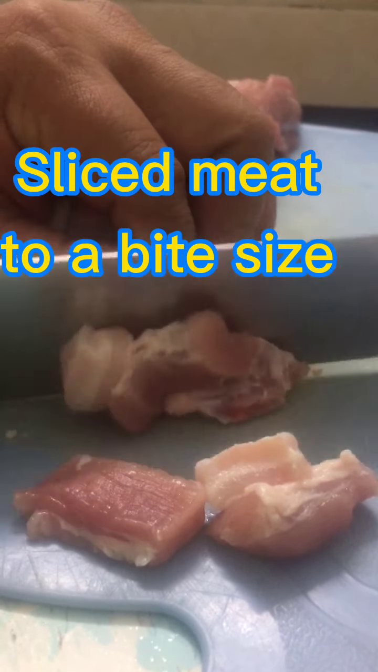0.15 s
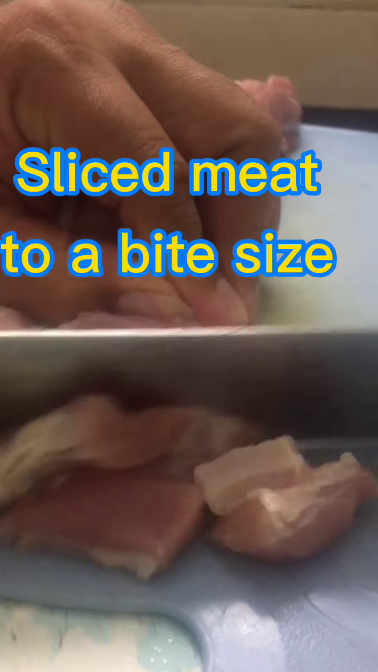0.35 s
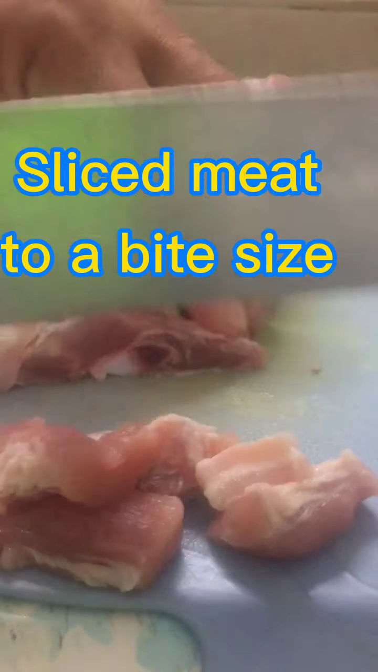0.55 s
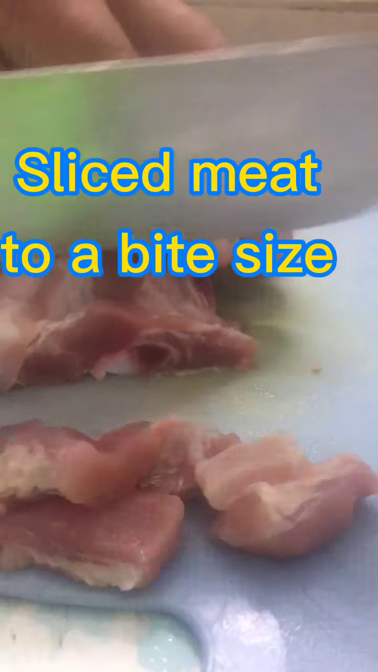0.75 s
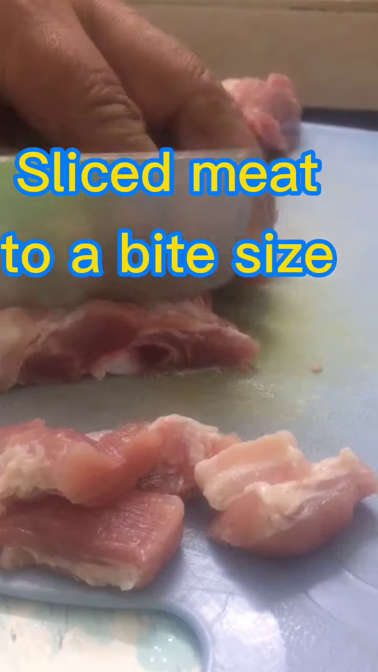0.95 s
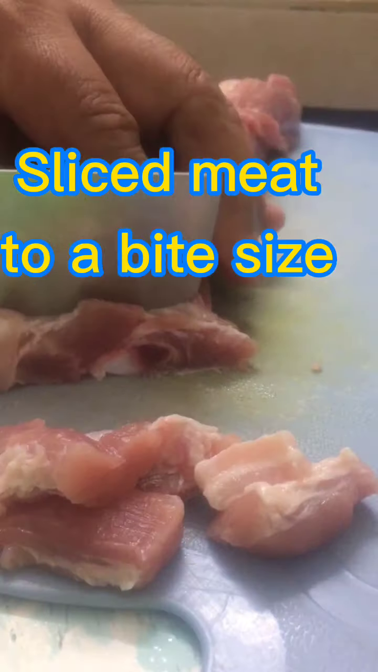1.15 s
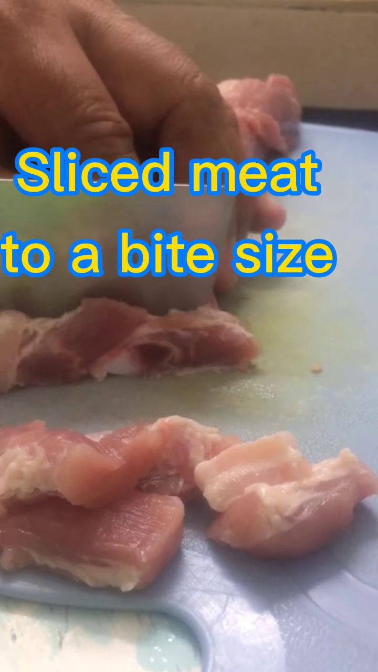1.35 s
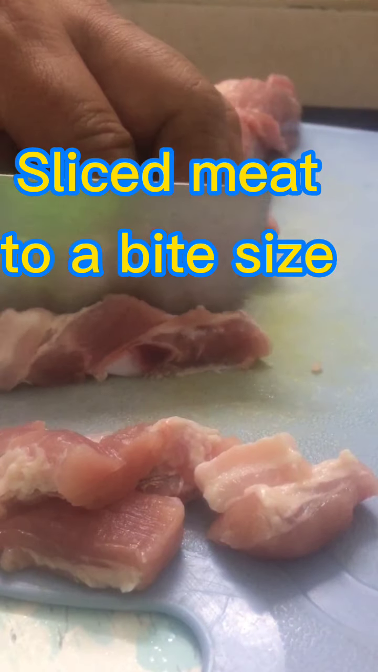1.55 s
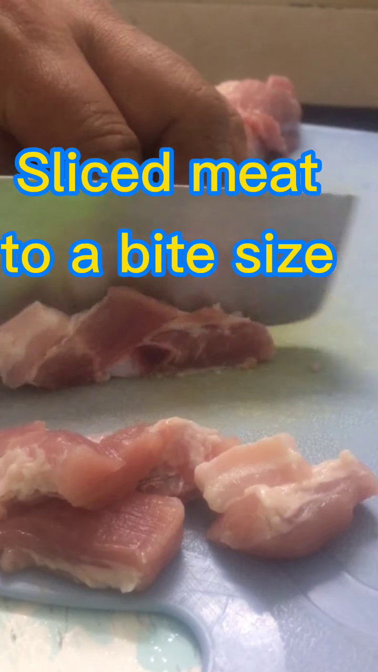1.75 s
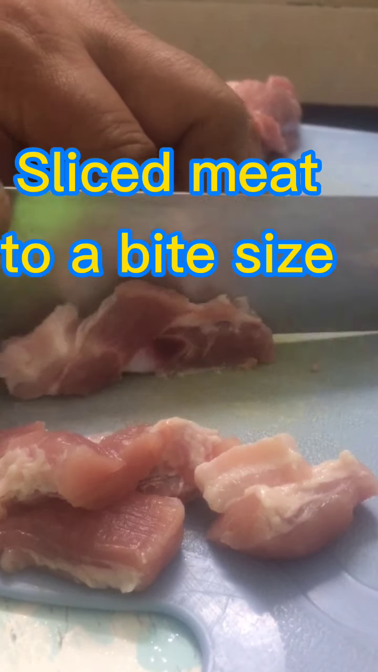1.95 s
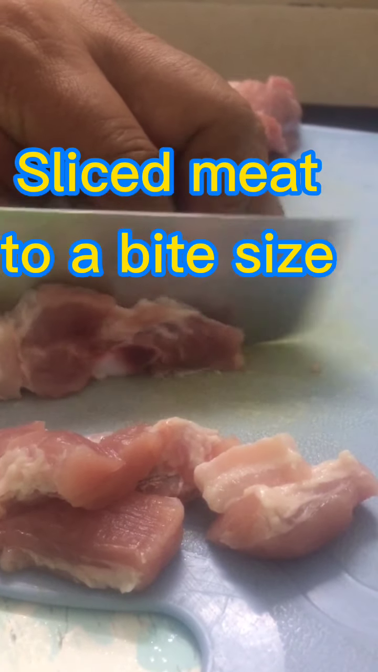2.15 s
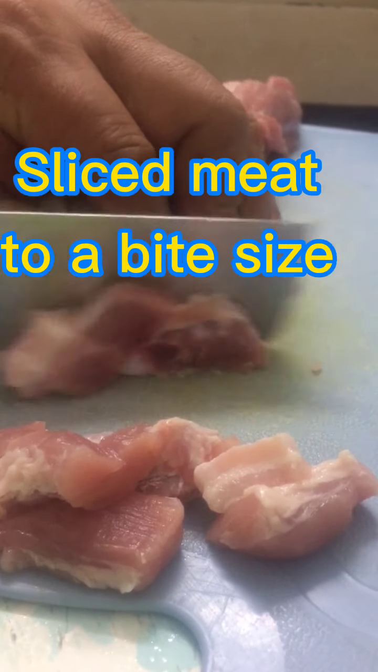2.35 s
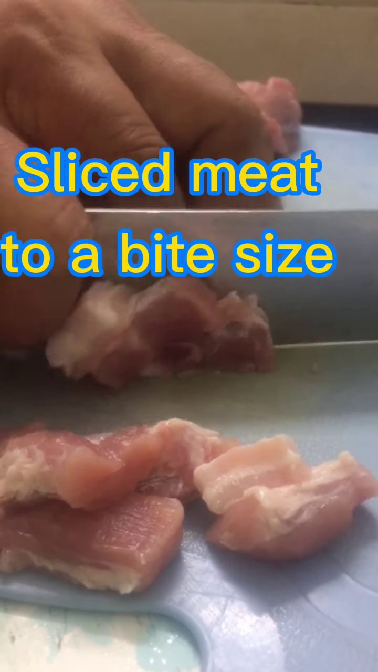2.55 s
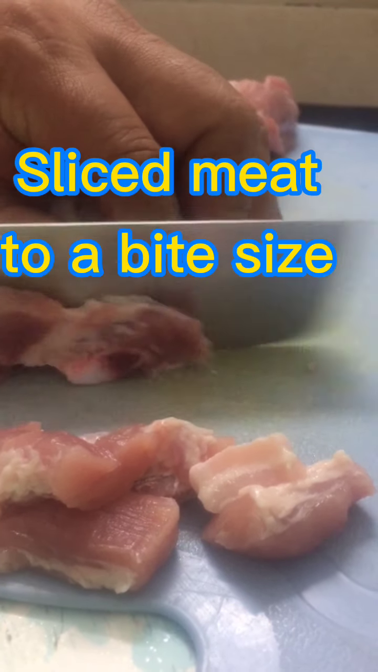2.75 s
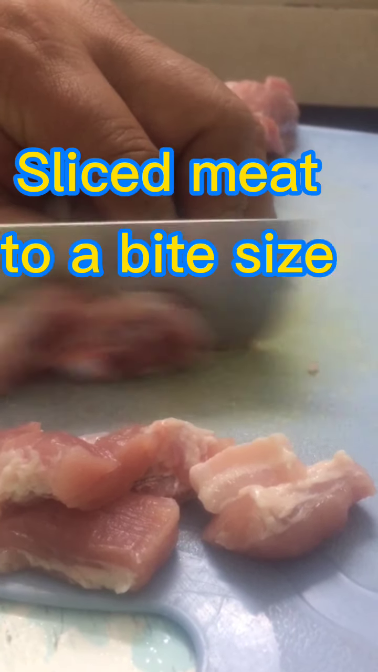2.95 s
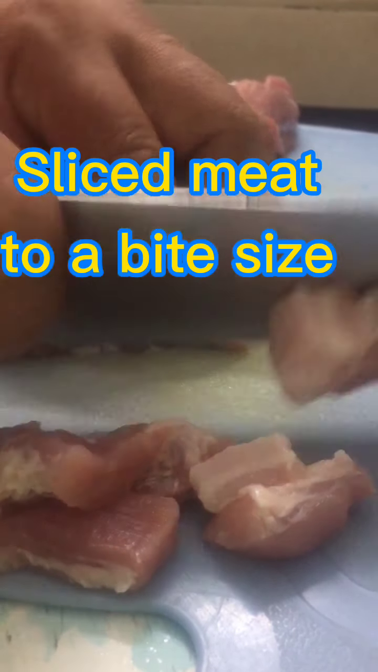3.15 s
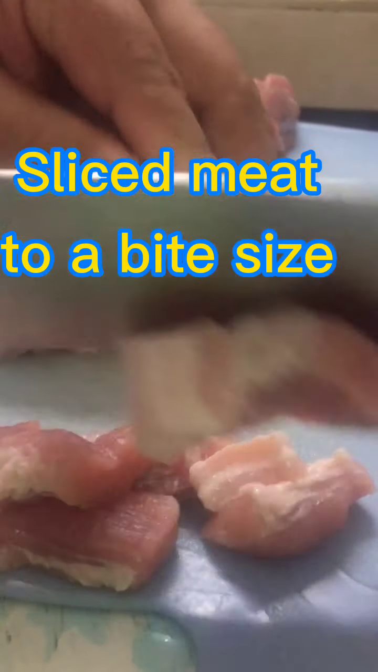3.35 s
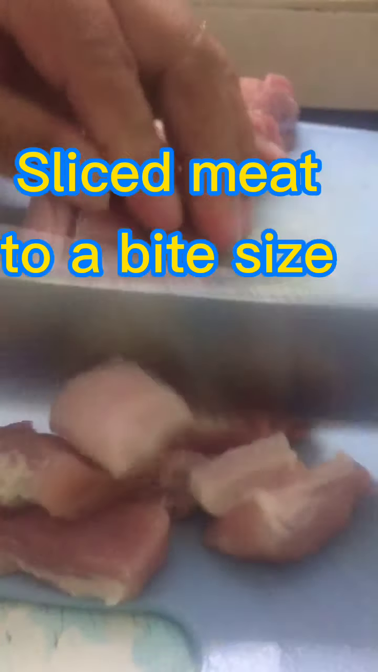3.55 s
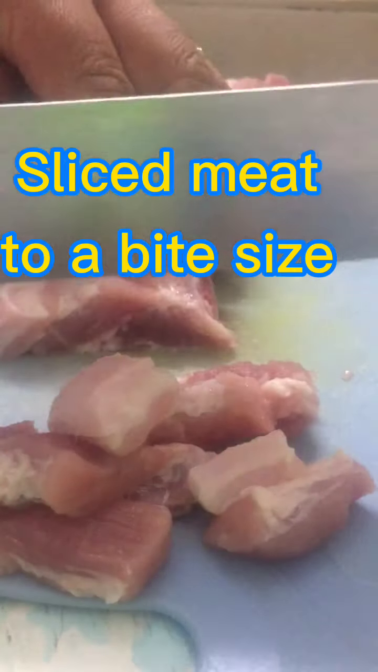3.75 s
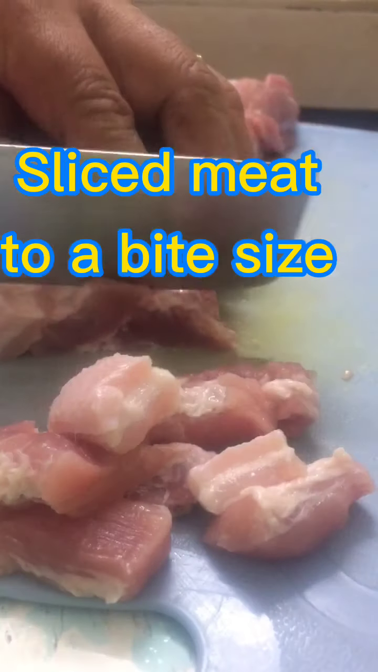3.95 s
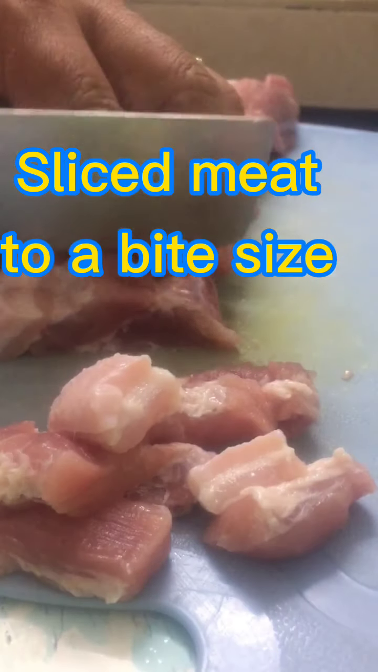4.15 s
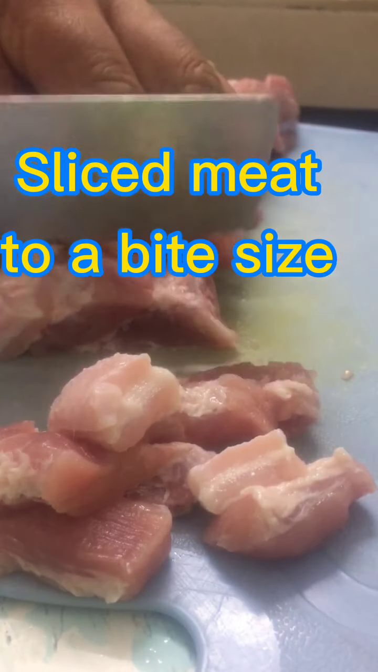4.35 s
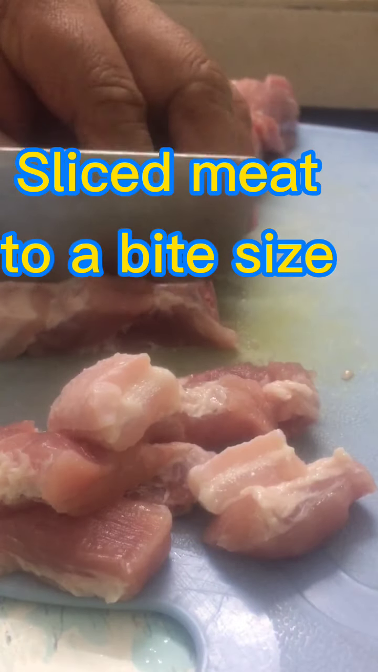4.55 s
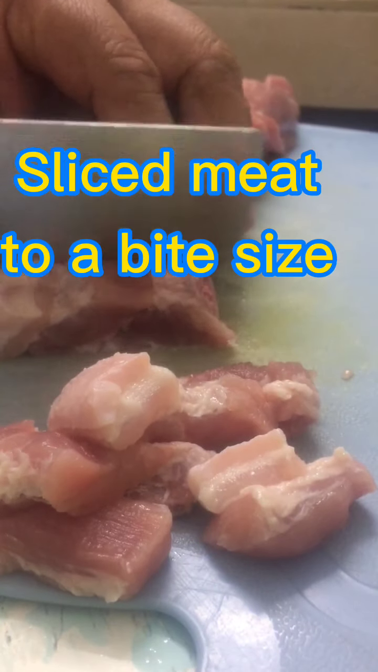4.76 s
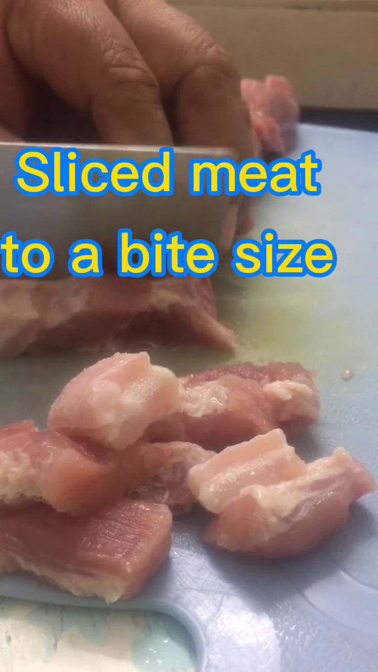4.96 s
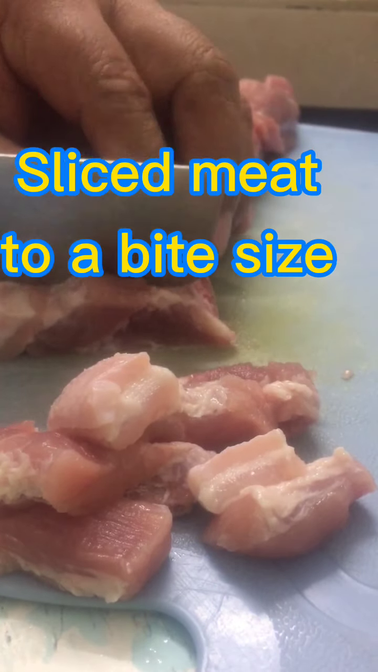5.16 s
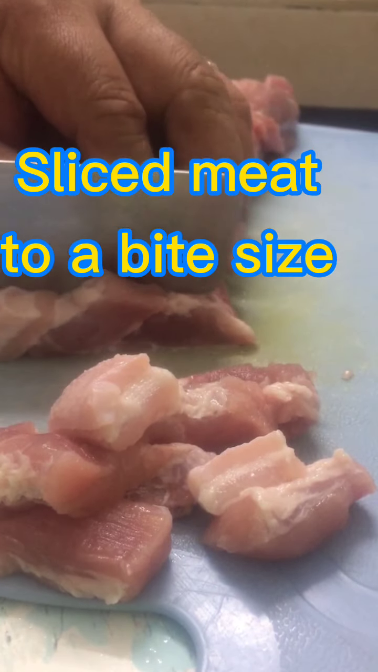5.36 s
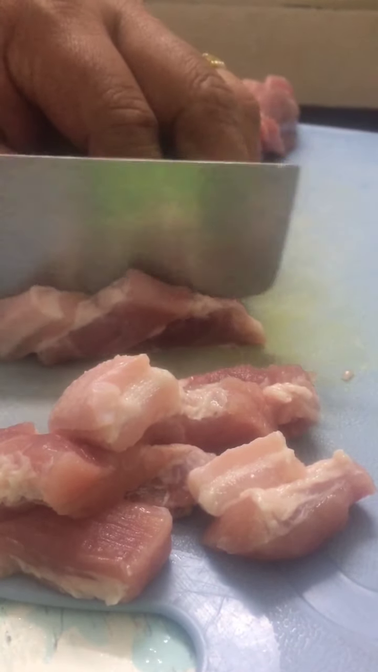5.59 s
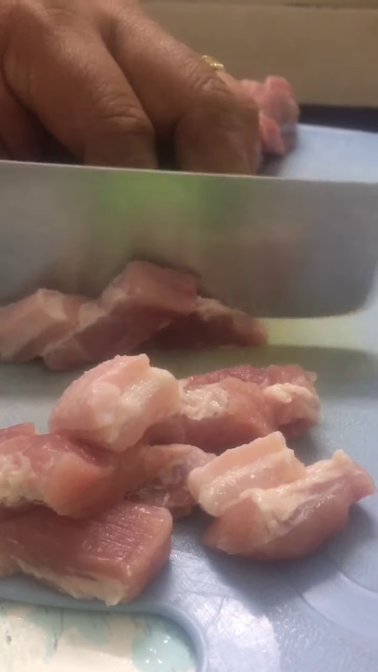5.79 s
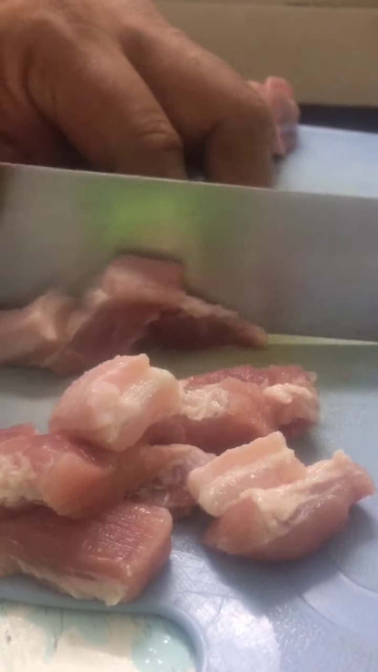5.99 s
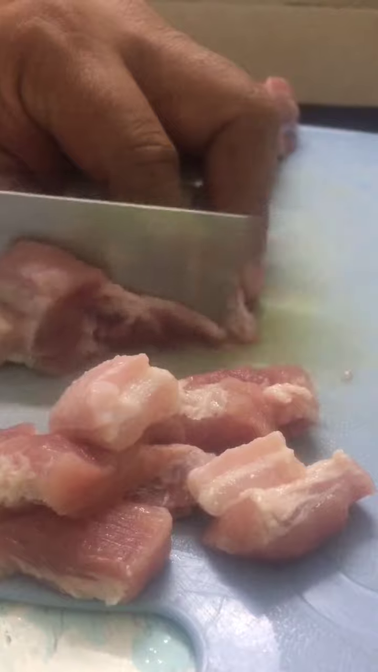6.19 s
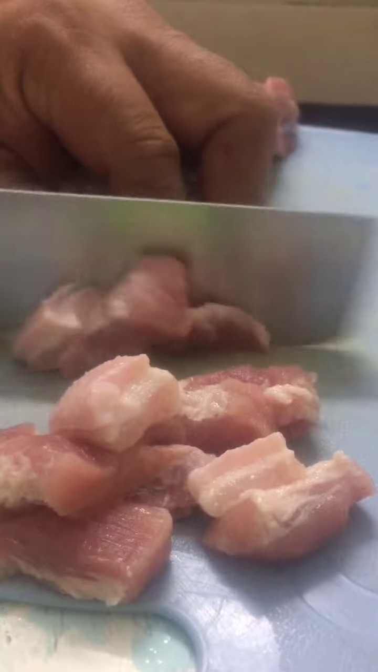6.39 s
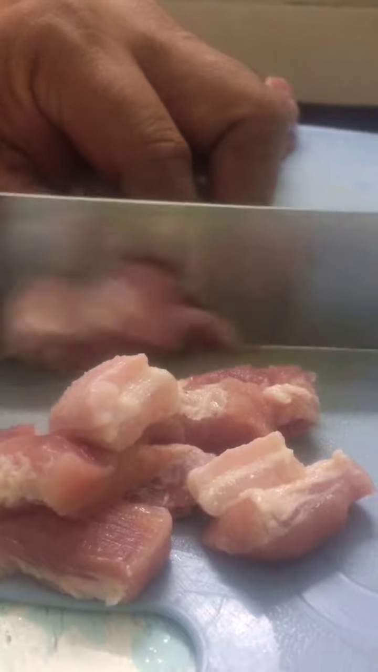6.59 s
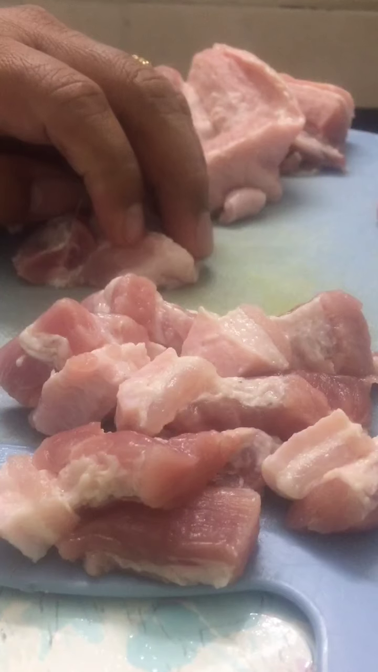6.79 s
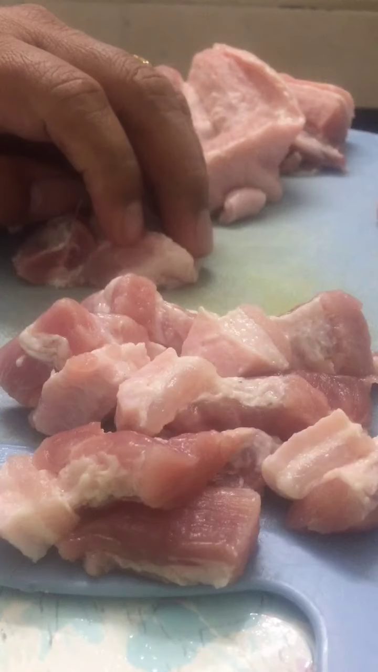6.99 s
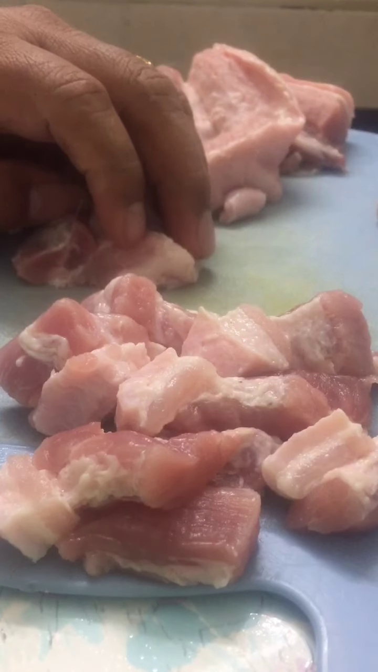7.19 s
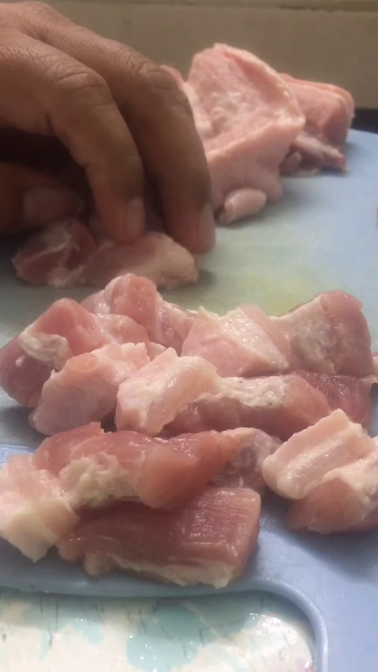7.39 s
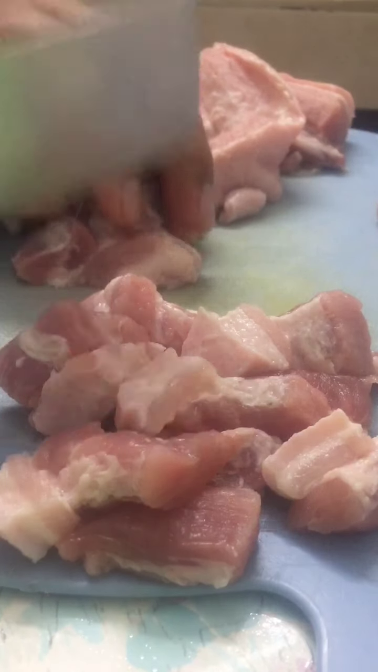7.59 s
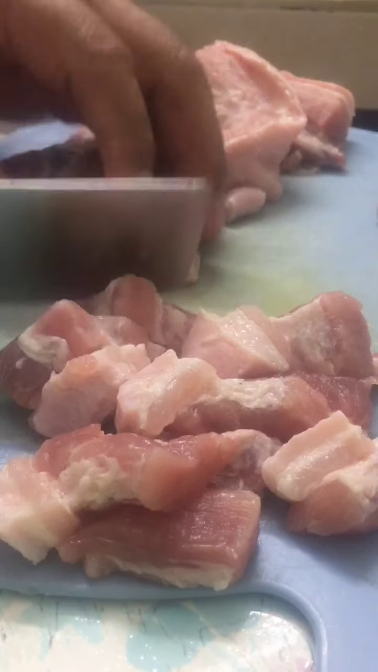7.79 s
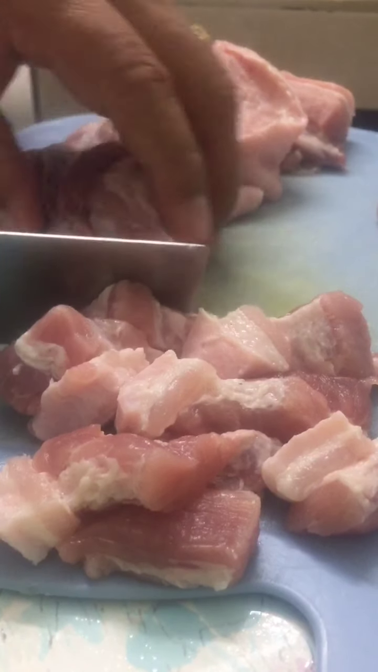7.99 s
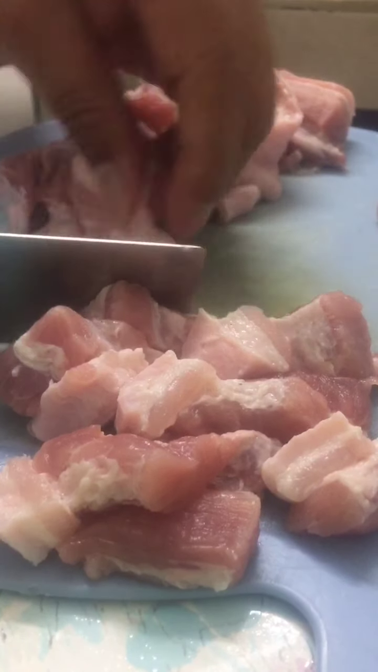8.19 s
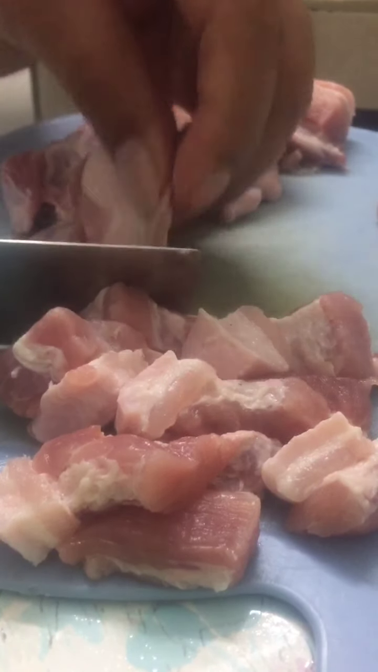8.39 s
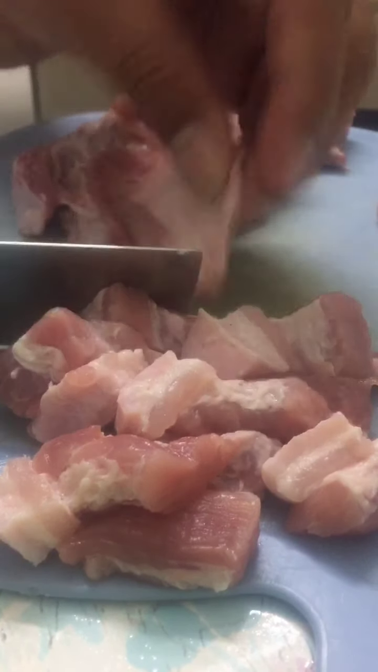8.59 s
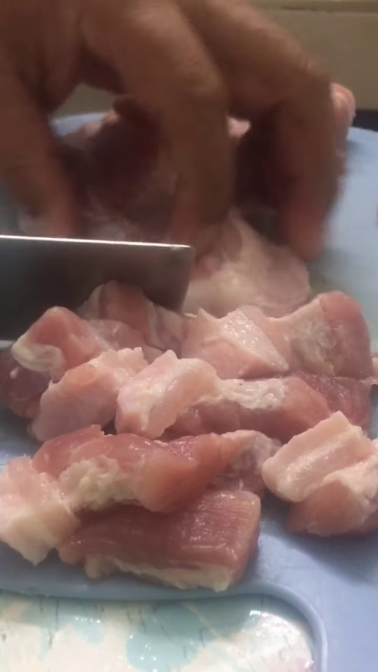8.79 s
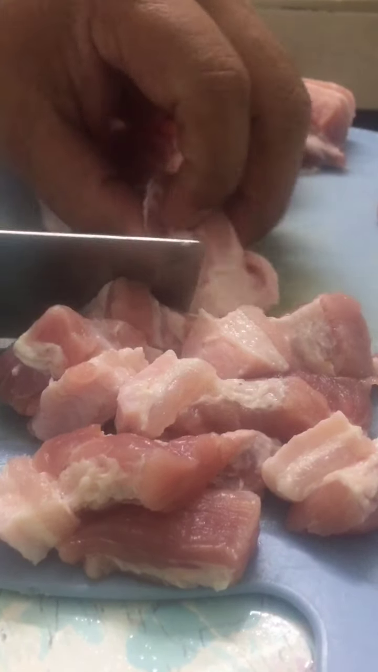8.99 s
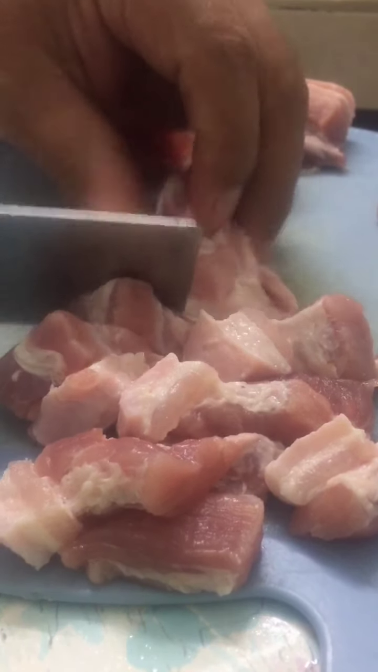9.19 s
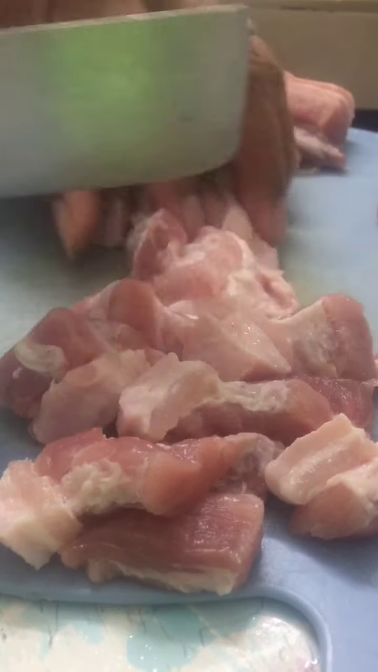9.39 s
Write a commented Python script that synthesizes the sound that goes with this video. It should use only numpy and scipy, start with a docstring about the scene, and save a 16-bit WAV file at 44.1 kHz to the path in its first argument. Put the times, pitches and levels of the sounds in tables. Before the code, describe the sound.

Close in a small kitchen with short reflections, a broad knife cuts raw meat on a plastic board. In the first 0.6 seconds, quick grainy strokes rasp and hiss, with a low thud, a bright tap and brief groaning squeaks. A pause follows, with muffled traffic and a low engine rev swelling around 1.6. From 1.7 to 3.1 come repeated sawing scrapes, loudest near 2.4 with a sharp click, then knocks at 3.4 and 3.6. Sparse thuds and taps at 4.3 to 4.6 lead to a fainter rev around 5.3. Sawing resumes from 5.7 to 6.7, rough and wet. At 6.7 everything cuts off abruptly to a much quieter background. Soft knocks arrive from 7.5, a short stroke at 8.1, sticky smacks and little clicks to 8.6, then a tearing stroke with a knock at 8.9 and final wet crackles until about 9.4.

```python
"""In a small kitchen, close by, a broad knife saws raw pork into pieces on a plastic cutting board.
Each stroke layers fibre slips ringing the board, scratches dragged under the edge, and a wet blade hiss.
Struck board modes knock, ringing snaps smack or click, and noise bands, some gliding, squeak and groan.
Filtered noise hums as traffic outside and an engine revs twice. At 6.727 s a cut to a later moment ends
the slice and its room tail; a second, quieter scene follows.
"""
import sys
import numpy as np
from scipy import signal
from scipy.io import wavfile
from scipy.ndimage import map_coordinates

SR = 44100
rng = np.random.default_rng(int(sys.argv[2]) if len(sys.argv) > 2 else 0)


def pcm_store(signal):
    """Save signal as 16-bit PCM."""
    levels = np.round(np.clip(np.atleast_2d(signal), -1, 1) * 32767)
    wavfile.write(sys.argv[1], SR, levels.astype(np.int16).T)


N = 416304
TIME, HZ = np.arange(N) / SR, np.fft.rfftfreq(8192, 1 / SR)
CUT_S = 6.727  # cut between the two scenes: kitchen sounds and room tails of the first end here
TOP_HZ = 16150  # upper limit of the sound


def amp(db):
    """Decibels to gain."""
    return 10 ** (np.asarray(db) / 20)


def unit(x):
    """Scales to rms 1."""
    return x / np.sqrt(np.mean(x ** 2) + 1e-20)


def read(points, hz):
    """Joins points by straight lines on a log-frequency axis."""
    point_hz, value = np.transpose(points)
    return np.interp(np.log(hz + 1), np.log(point_hz), value)


def add(mix, start_s, sound):
    """Mixes a sound in at start_s; the cut ends whatever began in the first scene."""
    stop = round(CUT_S * SR) if start_s < CUT_S else N
    part = mix[max(round(start_s * SR), 0):stop][:len(sound)]
    part += sound[:len(part)]


def colour(x, db):
    """Causal minimum-phase filter with the gain db on the grid HZ."""
    log_gain = np.log(amp(np.r_[db, db[-2:0:-1]]))
    response = np.fft.ifft(np.exp(np.conj(signal.hilbert(log_gain)))).real
    return signal.oaconvolve(x, response[:len(HZ)])[:len(x)]


def band(x, hz, kind, order=1):
    """Butterworth filter."""
    sections = signal.butter(order, np.clip(hz, 10, .48 * SR), kind, fs=SR, output="sos")
    return signal.sosfilt(sections, x)


def slips(length, per_s, spread_db):
    """Random tiny clicks of uneven size and either sign, as when a rough contact slips."""
    size = amp(spread_db * np.clip(rng.standard_normal(length), -2, 2))
    sign = rng.choice([-1, 1], length)
    return unit(size * sign * (rng.random(length) < per_s / SR))


def drift(hz):
    """Slow random wander of rms 1, up to about hz."""
    return unit(band(rng.standard_normal(N), hz, "low", order=2))


# strokes of the knife; levels are at full speed in mid-stroke, before the trims in strokes():
# start_s, speed_up_s, steady_s, slow_down_s, tear_level_db, scrape_level_db, hiss_level_db,
# resistance_growth_db (of the meat over the stroke), pressure_growth_db (on the board over the stroke)
STROKES = [ (0, 0.0017, 0.022, 0.072, -48, -34.5, -46, -3, -11),
           (.085, 0.077, 0.12, 0.036, -34, -39, -38.5, -4.5, -21),
           (0.361, .076, 0.0025, 0.11, -32, -31, -31.5, 0.5, -13.5),
           (1.705, 0.19, 0.086, 0.12, -32, -43, -44, 14, 22),
           (2.098, 0.11, 0.0034, 0.19, -36, -34, -37, 0, 6),
           (2.393, 0.11, 0.0023, 0.18, -31, -25.5, -31, 20, 21),
           (2.691, 0.11, 0.034, 0.15, -39.5, -30, -33.5, -16, 12.5),
           (2.97, 0.14, 0.074, 0.024, -32, -31.5, -33.5, -8, -3.5),
           (3.645, 0.0071, 0.0079, 0.13, -60, -52, -67, -1, -14),
           (5.736, 0.0045, 0.2, 0.16, -32, -45, -44, 7.5, 23),
           (6.076, 0.095, .14, 0.072, -35, -43, -41, 1.5, -10),
           (6.393, 0.15, 0.0076, 0.11, -31, -29, -31.5, 13, -6),
           (6.646, 0.06, 0.014, 0.011, -33, -38, -40.5, -25, 21),
           (8.107, 0.037, .006, 0.074, -36.5, -48, -60, 2, -8),
           (8.889, 0.025, 0.028, 0.095, -29, -39.5, -44, -12.5, -17)]


def strokes(tear_trim_db=-2.5, scrape_trim_db=-1.5, catch_db=0.33):
    """Blade speed drives three contacts: fibres tear, the edge scrapes the plastic, the wet blade hisses."""
    textures = np.array([amp(tear_trim_db) * tear(), amp(scrape_trim_db) * scrape(), hiss()])
    textures *= amp(catch_db * drift(63))  # the blade advances unevenly
    out = np.zeros(N)
    for start_s, rise_s, steady_s, fall_s, tear_db, scrape_db, hiss_db, resist_db, press_db in STROKES:
        speed = blade_speed(rise_s, steady_s, fall_s)
        progress = np.linspace(-.5, .5, len(speed))
        # each contact grows as its own power of the speed
        gains = [amp(tear_db + resist_db * progress) * speed,
                 amp(scrape_db + press_db * progress) * speed ** 1.67,
                 amp(hiss_db + press_db * progress) * speed ** 2.63]
        passage = textures[:, max(round(start_s * SR), 0):][:, :len(speed)]
        add(out, start_s, (gains * passage).sum(0))
    return out


def blade_speed(rise_s, steady_s, fall_s):
    """The arm swings the blade from rest to full speed (1), holds it and brakes."""
    corners_s = np.cumsum([0, rise_s, steady_s, fall_s])
    swing = np.interp(TIME[:int(corners_s[-1] * SR)], corners_s, [0, 1, 1, 0])
    return np.sin(np.pi / 2 * swing)


# spectral colour of the tearing meat: freq_hz, gain_db
TEAR_COLOUR = [(40, -8.5), (100, -9), (160, -21), (220, -2.5), (300, -1), (450, 5.5), (700, -5.5),
               (1200, -7.5), (3000, -33.5)]


def tear(dead_share=0.41):
    """Parting fibres shake the board into a drone; meat lying on it deadens part of its ring."""
    fibres = slips(N, per_s=900, spread_db=3)
    ringing = unit(signal.oaconvolve(fibres, board_ring())[:N])
    deadened = unit(band(fibres, 680, "low"))
    return unit(colour(ringing + dead_share * deadened, read(TEAR_COLOUR, HZ)))


# spectral colour of the edge on plastic: freq_hz, gain_db
SCRAPE_COLOUR = [(60, -19), (170, -6), (350, -6), (600, -8), (900, 1), (1500, -0.5), (2000, 8.5),
                 (2700, -6), (3500, -14), (4500, -13), (6000, -51), (10000, -38.5)]
# resonances of blade and board in contact: freq_hz, width_hz, lift_db
CONTACT = [(570, 130, 7.5), (671, 68, 13.5), (748, 72, 7), (1110, 160, 8), (1240, 34, -0.5),
           (1500, 35, -2.5), (1890, 94, -2), (2140, 300, -6), (2270, 280, 3), (2620, 24, 1), (3060, 110, 8),
           (3950, 110, 11.5)]


def scrape():
    """The edge catches on scratches in the plastic and excites the blade and board in contact."""
    lift_db = sum(db / (1 + (2 * (HZ - hz) / width_hz) ** 2) for hz, width_hz, db in CONTACT)
    scratches = colour(slips(N, per_s=5000, spread_db=4), read(SCRAPE_COLOUR, HZ) + lift_db)
    return along_blade(patchy(scratches, patch_db=2.5, width_hz=38, hold_s=0.011))


# spectral colour of the blade's hiss: freq_hz, gain_db
HISS_COLOUR = [(800, -37.5), (2000, 7), (3200, 2), (5000, 0.5), (6200, 2.5), (7600, -4.5), (9800, -4),
               (10400, -14.5), (11400, -6), (16000, -18.5)]


def hiss():
    """Dense slips along the wet blade hiss; sparse treble clicks crackle on top."""
    rub = colour(slips(N, per_s=14000, spread_db=2), read(HISS_COLOUR, HZ))
    crackle = unit(band(slips(N, per_s=160, spread_db=5), 10000, "high", order=2))
    return along_blade(patchy(rub, patch_db=3, width_hz=130, hold_s=0.0066)) + amp(-11) * crackle


def patchy(x, patch_db, width_hz, hold_s):
    """The contact changes as the edge moves on: bands of the sound swell and sink for a moment."""
    spectrum = signal.stft(x, nperseg=512)[2]
    field = rng.standard_normal(spectrum.shape)
    # smooth the random field over frequency, then over time
    for axis, reach in enumerate([width_hz * 512 / SR, hold_s * SR / 256]):
        keep = np.exp(-1 / reach)
        field = signal.filtfilt([1 - keep], [1, -keep], field, axis=axis, padtype="even")
    gain = amp(patch_db * np.clip(unit(field), -2, 2))
    return unit(signal.istft(spectrum * gain, nperseg=512)[1][:N])


def along_blade(x, echo=0.43, delay_s=0.000753, travel=0.279):
    """The contact point wanders along the edge, so its echo from the blade's end sweeps bands."""
    wandering_s = delay_s * np.exp(travel * drift(2.5))
    return unit(x + echo * map_coordinates(x, [np.arange(N) - wandering_s * SR], order=3))


# modes of the board on its counter: freq_hz, level_db (before weight and hardness), t60_s
BOARD = [(61, -10, 0.23), (97.1, -2, 0.25), (118.5, -7, 0.21), (217.4, 5, 0.18), (280.6, 3.5, 0.13),
         (308.8, 3, 0.14), (365.8, -5, 0.079), (416.6, -10, 0.084), (505, -31, .15), (534.2, -10.5, 0.41),
         (667, -2, 0.05), (745, -4, 0.114), (977, -14.5, 0.3), (1210, -21, .12)]


def board_ring(hard_hz=20000, weight_db=0, bass_hz=150):
    """The board's answer to one push: a soft push misses the high modes, weight lifts the bass modes."""
    t = TIME[:SR // 2]
    ring = np.zeros(len(t))
    for hz, db, t60_s in BOARD:
        lift_db = weight_db / (1 + (hz / bass_hz) ** 4)
        share = amp(db + lift_db) / np.hypot(1, (hz / hard_hz) ** 2)
        ring += share * amp(-60 * t / t60_s) * np.sin(2 * np.pi * hz * t)
    return ring


# blows of blade and meat on the board; level_db is relative to the first 20 ms of the blow:
# start_s, level_db, hardness_hz (cut-off), weight_db (bass lift), crack_db (edge, before scaling)
KNOCKS = [ (0.106, -26, 500, 22, -29.5), (0.759, -46.5, 450, 11, -20), (2.391, -31, 9000, -36, -1.5),
          (2.546, -28, 900, 36, -27), (2.997, -27.5, 500, 22, -26), (3.109, -51, 800, 5, 16),
          (3.407, -25, 577, 11.5, 4), (3.637, -29, 6000, 12, 11), (4.315, -41, 590, 9, -24),
          (4.342, -32, 85.4, 13, -29), (4.639, -48, 400, 16, -39), (5.613, -37.5, 360, -7, -10),
          (5.739, -44, 700, -10, 1), (5.962, -33, 594, -7, -25), (6.535, -30.5, 503, 28, -45),
          (6.656, -36.5, 800, 16, 12), (7.528, -46.5, 330, 7.5, -23), (8.015, -36, 390, -0.5, -16),
          (8.133, -32, 602, -15.5, -15), (8.283, -44.5, 400, 10, 6), (8.8874, -33, 5000, 8, 0.5),
          (9.178, -42, 456, 5, 4), (9.316, -51, 795, -7, -1)]


def knocks(crack_t60_s=0.049, crack_size=2.22, rise_s=0.0013):
    """A blow rings the board; bare steel adds a crack of noise, meat softens the blow."""
    out, t = np.zeros(N), TIME[:SR // 2]
    for start_s, db, hard_hz, weight_db, crack_db in KNOCKS:
        noise = unit(band(rng.standard_normal(len(t)), [500, 3500], "band"))
        crack = crack_size * noise * amp(crack_db - 60 * t / crack_t60_s)
        blow = board_ring(hard_hz, weight_db) * (1 - np.exp(-t / rise_s))
        blow += band(crack, hard_hz, "low", order=2)
        add(out, start_s, amp(db) * blow / np.std(blow[:SR // 50]))
    return out


# smacks of wet meat, and bright clicks of the blade tapping the board:
# start_s, peak_db, centre_hz, width_octaves, length_s (to 10 dB down)
SMACKS_AND_CLICKS = [ (0.086, -28, 1640, 2, 0.016), (0.379, -21.5, 10900, 2.5, .0031),
                     (0.564, -29, 8500, 1.77, 0.015), (.568, -32.5, 5300, 1.06, 0.0082),
                     (.655, -50, 14000, .6, .002), (0.763, -47.5, 2420, 2.4, .018),
                     (.941, -36, 3400, 2, 0.0062), (1.491, -45, 13100, 0.9, 0.0034),
                     (1.64, -34, 12800, 0.66, .003), (1.72, -37, 6300, 0.77, 0.0023),
                     (1.747, -23.5, 6100, 3.36, .008), (1.798, -29, 7540, 2, .0025),
                     (2.3913, -14.5, 9000, 1.42, 0.0014), (3.282, -30.5, 1994, 1.1, 0.0097),
                     (3.351, -42.5, 3450, 1.4, .0056), (3.625, -34, 4800, 10, 0.0078),
                     (3.64, -35, 6400, 1.2, 0.018), (3.674, -37, 7040, 2.4, 0.0027),
                     (4.067, -47, 2150, 2.6, 0.011), (4.314, -30, 4900, 3.56, .011),
                     (4.327, -33.5, 4850, 3.2, 0.0065), (4.35, -47, 2790, .9, 0.009),
                     (7.714, -54, 12100, 1.3, 0.046), (7.722, -55, 2200, 0.51, 0.037),
                     (7.7414, -33.5, 1880, 1.4, 0.0069), (7.742, -40, 10700, 2, .002),
                     (8.117, -41, 3030, 1.94, 0.014), (8.204, -43, 11000, 1.25, 0.0098),
                     (8.291, -40, 7500, 2.5, .003), (8.317, -30, 11850, 1.34, 0.0034),
                     (8.318, -43, 2600, 2.3, 0.0035), (8.417, -48, 2183, 0.5, 0.039),
                     (8.433, -42, 5160, 1.9, 0.0028), (8.512, -41.5, 7000, 4.4, 0.015),
                     (9.007, -36.5, 4740, 1.2, 0.0084), (9.09, -43.5, 2243, 0.55, 0.054),
                     (9.172, -44.5, 2100, 2.2, 0.031), (9.228, -37, 2206, 1.1, 0.014),
                     (9.247, -33, 4300, 2.7, .005), (9.314, -40, 2600, 1.8, 0.017)]


def smacks_and_clicks():
    """Wet meat smacks and the blade taps bright clicks on the board, all as bursts of ringing snaps."""
    out = np.zeros(N)
    for start_s, db, hz, octaves, length_s in SMACKS_AND_CLICKS:
        add(out, start_s, snap_burst(db, hz, octaves, length_s))
    return out


def snap_burst(db, hz, octaves, length_s, fade_db=10, pop=3, pop_s=0.02, snaps_per_s=550, count=6):
    """A pop, then loose snaps, ring a few resonances; in a smack, juice lets go over air pockets in meat."""
    t = TIME[:int((2 * length_s + .006) * SR)]
    fade = amp(-np.minimum(fade_db * (t / length_s) ** 2, 80))
    sound = np.zeros(len(t))
    # resonances are spread over the width, each a little off its place
    for place in (np.arange(count) + rng.random(count)) / count - .5:
        snaps = slips(SR // 5, snaps_per_s, spread_db=5)[:len(t)] * np.sqrt(snaps_per_s / SR)
        snaps[0] += pop * np.exp(-length_s / pop_s)  # a slow peel has little pop
        ring_hz = min(hz * 2 ** (octaves * place), TOP_HZ)
        ring = band(snaps * fade[:len(snaps)], [ring_hz - 200, ring_hz + 200], "band")
        sound[:len(ring)] += rng.choice([-1, 1]) * ring
    limits_hz = hz * 2. ** ((octaves / 2 + .5) * np.array([-1, 1]))
    sound = band(sound, limits_hz, "band", order=2)
    return amp(db) * sound / (abs(sound).max() + 1e-12)


# meat is pressed or peeled apart and crackles by itself:
# start_s, length_s, smacks_per_s, typical_peak_db, centre_hz
PEELS = [ (1.628, .13, 71, -50, 11200), (3.225, 0.13, 37, -49, 9000), (5.64, 0.091, 320, -58.5, 6300),
         (8.199, .13, 208, -55.5, 2820), (8.297, 0.065, 300, -53.5, 14200), (8.539, .07, 260, -52, 5610),
         (9.084, .19, 216, -50, 6570)]


def peels(spread_db=7, spread_octaves=0.56, width_octaves=3.52, smack_s=0.0075):
    """Sticky meat comes loose in a scatter of small smacks of chance size and pitch."""
    out = np.zeros(N)
    for start_s, length_s, per_s, db, hz in PEELS:
        count = max(round(length_s * per_s), 1)
        for k, (when, size, pitch) in enumerate(rng.uniform(-1, 1, (count, 3))):
            centre_hz = hz * 2 ** (spread_octaves * pitch)
            sound = snap_burst(db + spread_db * size, centre_hz, width_octaves, smack_s)
            add(out, start_s + length_s * (k + .5 + when / 2) / count, sound)
    return out


# brief bands of noise around one pitch: squeaks, groans and broader scrapes of the blade;
# middle_s, length_s, pitch_hz, width_hz, glide_octaves (0 holds the pitch), level_db (before the swell)
SQUEAKS = [ (.02, 0.054, 1056, 203, 0, -55), (0.173, 0.064, 725, 162, -.8, -32),
           (0.231, .07, 307.5, 69, -.41, -29.5), (0.434, 0.11, 5680, 400, 0, -32.5),
           (0.431, 0.11, 2463, 1010, 0, -25.5), (0.573, 0.019, 2145, 160, -.12, -42),
           (0.576, 0.013, 3670, 150, -0.078, -47), (0.943, 0.0094, 3710, 300, .086, -46),
           (1.75, 0.031, 6750, 500, -.17, -35), (1.951, 0.095, 307, 60.5, 0.11, -28),
           (2.898, 0.16, 2774, 990, 0, -35), (3.11, 0.28, 2030, 160, 0, -41.5),
           (3.123, 0.054, 649, 50, 0, -29), (3.127, 0.18, 422.5, 110, 0, -31),
           (4.315, 0.031, 5830, 203, .039, -51.5), (5.615, 0.029, 2300, 410, -.2, -56),
           (6.29, 0.19, 2414, 604, 0.22, -42.5), (6.539, .2, 1114, 90, .039, -33),
           (8.156, 0.12, 2200, 600, -.3, -44.5), (9.318, 0.024, 2123, 448, 0, -50)]


def squeaks():
    """Noise on a carrier makes a band around one pitch, steady or gliding, that swells and fades."""
    out = np.zeros(N)
    for middle_s, length_s, hz, width_hz, glide, db in SQUEAKS:
        swell = signal.windows.hann(int(length_s * SR))
        pitch_hz = hz * 2 ** (glide * np.linspace(-.5, .5, len(swell)))
        carrier = np.exp(2j * np.pi * np.cumsum(pitch_hz) / SR)
        noise = rng.standard_normal(SR) + 1j * rng.standard_normal(SR)
        rough = band(noise, width_hz / 2, "low", order=2)[-len(swell):]
        squeak = unit((carrier * rough).real * swell) * np.sqrt(np.mean(swell ** 2))
        add(out, middle_s - length_s / 2, amp(db) * squeak)
    return out


# decay of the room: freq_hz, t60_s
KITCHEN = [(100, 0.49), (300, 0.49), (800, 0.14), (2000, 0.3), (5000, 0.25), (14000, 0.35)]


def kitchen(x, wet_db=-10):
    """Near walls give a dense tail of random reflections whose decay time depends on frequency."""
    taps = slips(SR // 2, per_s=4000, spread_db=2) * (TIME[:SR // 2] > .004)
    hz, t, spectrum = signal.stft(taps, SR, nperseg=256)
    decay = amp(-60 * t / read(KITCHEN, hz)[:, None])
    tail = signal.istft(spectrum * decay, SR, nperseg=256)[1]
    tail = amp(wet_db) * band(tail / np.linalg.norm(tail), [250, 9000], "band")
    out, cut = x.copy(), round(CUT_S * SR)
    add(out, 0, signal.oaconvolve(x[:cut], tail))
    add(out, CUT_S, signal.oaconvolve(x[cut:], tail))
    return out


# spectral colour of the traffic through the walls: freq_hz, gain_db
TRAFFIC_COLOUR = [(25, -23), (45, 5.5), (60, 7.5), (76, -0.5), (105, 6.5), (150, -5), (225, -4),
                  (290, -21.5), (400, -33), (600, -41), (1200, -45), (4000, -48.5)]
# traffic level over time; at the cut to the second scene it drops at once: time_s, level_db
STREET = [(0, -45), (.8, -49), (1.6, -47.5), (3.4, -46.5), (4.0, -52.5), (4.6, -48), (5.3, -50.5),
          (6.0, -44.5), (6.7, -48.5), (6.75, -65), (9.44, -58.5)]


def traffic():
    """Traffic hums through the walls: low-coloured noise at the level set for each moment."""
    level_db = np.interp(TIME, *np.transpose(STREET))
    return amp(level_db) * unit(colour(rng.standard_normal(N), read(TRAFFIC_COLOUR, HZ)))


# an engine in the street revs and eases off:
# top_s, rise_s, fall_s, top_firing_hz, idle_drop_share (of the firing rate), level_db (at the top)
REVS = [(1.622, .75, 0.56, 131.1, .32, -44), (5.33, .4, 0.11, 127.2, .06, -53)]


def engine(waver=0.0145, flutter_db=3, second_db=-15):
    """Throttle lifts the engine's loudness and firing rate; both waver, and a second harmonic adds edge."""
    out = np.zeros(N)
    for top_s, rise_s, fall_s, hz, sag, db in REVS:
        throttle = np.exp(-((TIME - top_s) / np.where(TIME < top_s, rise_s, fall_s)) ** 2)
        firing_hz = hz * (1 - sag * (1 - throttle)) * (1 + waver * drift(10))
        phase = 2 * np.pi * np.cumsum(firing_hz) / SR
        tone = np.sin(phase) + amp(second_db) * np.sin(2 * phase)
        out += amp(db) * throttle * unit(tone * amp(flutter_db * drift(9.2)))
    return out


# spectral colour of the still air: freq_hz, gain_db
AIR_COLOUR = [(25, -27), (50, -1), (100, -0.5), (135, -5.5), (170, -14.5), (230, -5), (300, -13.5),
              (450, -17.5), (700, -21.5), (1200, -27), (3500, -28.5), (8000, -36.5), (15800, -40)]


def room_air(level_db=-60.5):
    """Still room air: steady, soft, low-weighted noise."""
    return amp(level_db) * unit(colour(rng.standard_normal(N), read(AIR_COLOUR, HZ)))


def scene():
    """The work on the board in its room, over street and air."""
    work = strokes() + knocks() + smacks_and_clicks() + peels() + squeaks()
    return (kitchen(work) + traffic() + engine() + room_air())[None]


def record(dry):
    """The microphone drops the deepest bass; a steep filter then limits the treble."""
    sound = band(dry, 58, "high", order=3)
    limiter = signal.firwin(511, TOP_HZ, window=("kaiser", 9), fs=SR)
    return signal.oaconvolve(sound, limiter[None], "same")


dry = scene()
out = record(dry)
pcm_store(out)
```